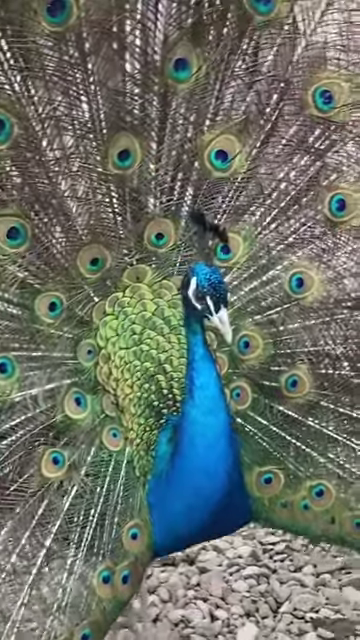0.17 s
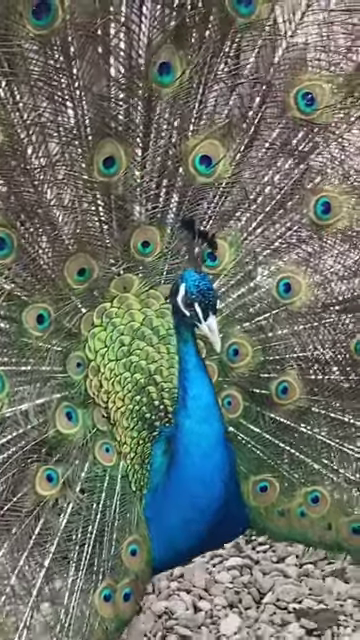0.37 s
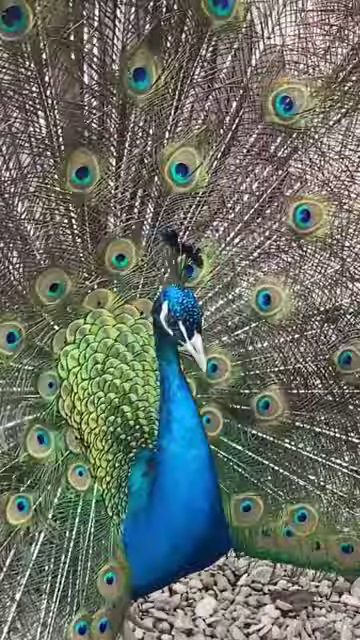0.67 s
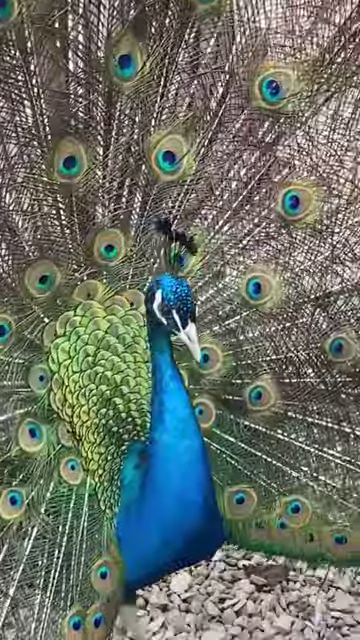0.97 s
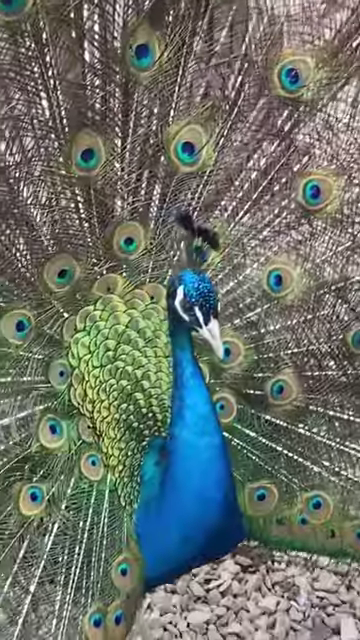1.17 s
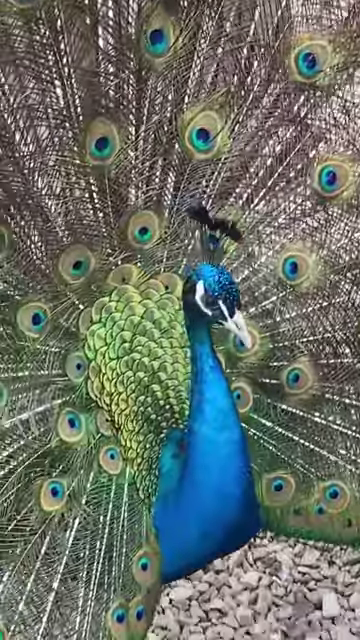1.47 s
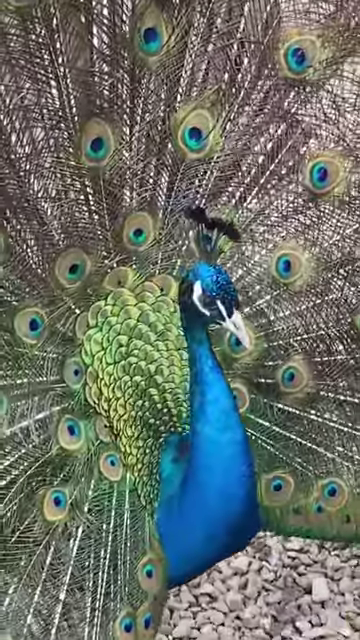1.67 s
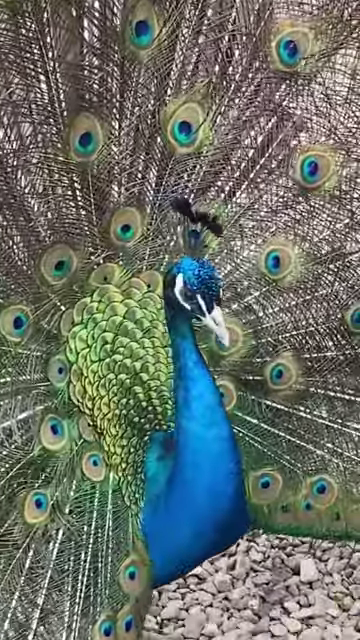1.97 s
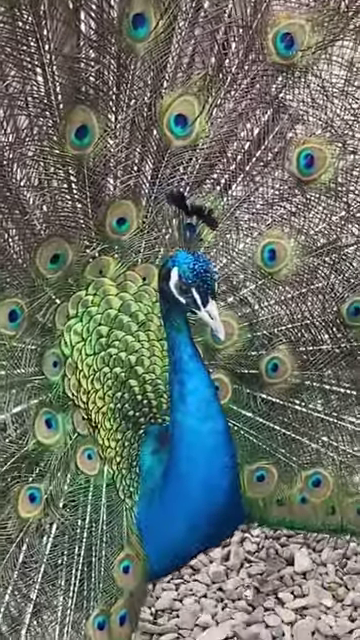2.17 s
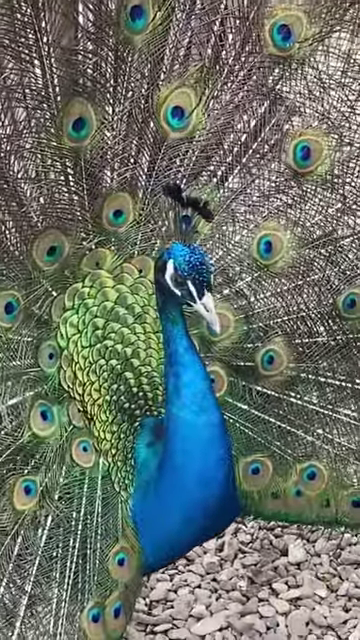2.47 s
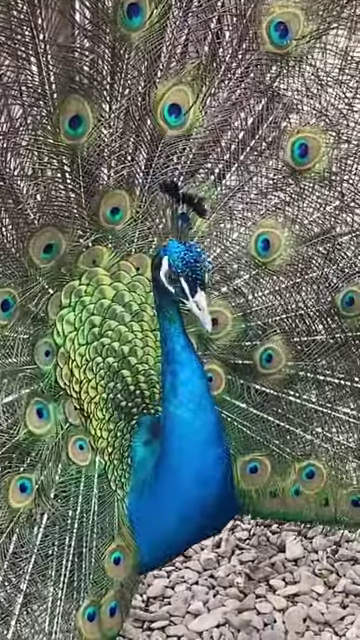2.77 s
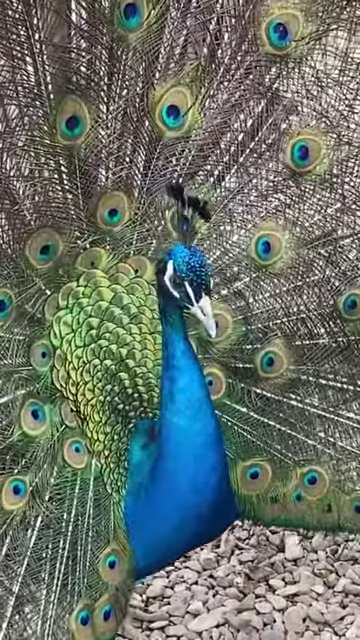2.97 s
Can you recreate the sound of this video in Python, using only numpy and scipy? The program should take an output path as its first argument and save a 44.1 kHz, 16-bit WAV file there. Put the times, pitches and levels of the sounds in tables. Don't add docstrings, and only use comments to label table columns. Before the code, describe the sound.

Peacock feathers rustle dryly close to a stereo phone, with irregular crisp ticks left and right, busiest before 0.7 s and sparse after 2.4 s. A far hoarse fowl call fades by 0.2 s. Reverberant falling sparrow chirps come at 0.1, 0.6, 1.0, 1.25, 2.0 and 2.7-3.0 s; clearer whistles at 0.6 and 2.3 s. Faint peeps, thin cicadas, low traffic and motor hum continue.

```python
import sys
import numpy as np
from scipy import signal
from scipy.io import wavfile

SR = 44100
rng = np.random.default_rng(int(sys.argv[2]) if len(sys.argv) > 2 else 0)


def nominal_scale(level):
    x = np.asarray(level, float) / 20
    return 10 ** x


def master(y):
    cut = np.clip(np.atleast_2d(y).T, -1, 1)
    pcm = np.round(cut * 32767)
    wavfile.write(sys.argv[1], SR, pcm.astype(np.int16))


N = 138033

# pitch_hz, level_db (per Hz)
BED_SPECTRUM = [(22, -80), (58, -52.5), (85, -61.5), (160, -61.5), (260, -66), (500, -69), (720, -77),
                (900, -76), (1400, -83), (2000, -87.5), (3400, -88.5), (4500, -93), (5200, -104), (8000, -108),
            (15000, -114)]
# pitch_hz, likeness_share
LEFT_RIGHT_LIKENESS = [(60, .99), (180, 1), (350, 0.52), (700, 0.32), (1400, 0.24), (3000, .02)]
# time_s, level_db
TRAFFIC_SWELL = [(0.0, -46), (0.29, -48), (1.25, -45.5), (2.51, -48.5), (2.75, -46.5), (2.9, -46.5),
                 (3.13, -45)]
TRAFFIC_REACH_HZ = 600
TRAFFIC_LAG_S = .0007

# time_s, pitch_hz, first_partial_db, second_partial_db
MOTOR_HUM = [(0.0, 106.5, -32.5, -45), (0.02, 107.2, -38, -46.5), (0.65, 107.6, -30, -35.5),
             (0.71, 107.0, -31, -42), (1.46, 106.2, -32, -36.5), (1.64, 105, -31, -41.5),
             (1.73, 105.9, -37, -35.5), (2.54, 105.6, -33, -47), (2.55, 104.6, -35, -61),
             (2.61, 105.8, -33.5, -44.5), (2.93, 105.4, -30.5, -42.5), (3.13, 105.2, -30.5, -36.5)]
HUM_THIRD_DB, HUM_FLUTTER_DB, HUM_LEAD_RAD = -72, 0.67, 0.31

# pitch_hz, width_hz, level_db
CICADA_BODIES = [(5628, 920, -54.5), (6487, 520, -51), (7040, 630, -54.5)]
CICADA_CLICKS_PER_S, CICADA_SWELL_DB = 9800, 1.52

# pitch_hz, width_hz, level_db
FOWL_THROAT = [(1340, 450, -47), (2000, 420, -45), (2194, 110, -48.5)]
FOWL_END_S, FOWL_RELEASE_S = 0.14, 0.041

# time_s, peak_db, left_right_db
QUILL_TICKS = [(0.018, -33, 0), (0.1085, -40, 2), (0.1226, -35, -12), (0.266, -40, 0.5),
               (0.2843, -43.5, -2), (0.3209, -37.5, 0.5), (0.4463, -46, -2), (0.4607, -39.5, 2),
               (0.4844, -41.5, -4), (0.5168, -39, 7), (0.5638, -42.5, -10), (0.632, -44, -0.5),
               (0.855, -49, -7), (0.9232, -40, -6), (0.9458, -53, -5.5), (1.0748, -37, -3),
               (1.4591, -47, -4), (1.5584, -48, 5), (1.6317, -47, -8), (1.6835, -46, -0.5),
               (1.779, -39.5, 5), (1.8982, -38, -2), (1.9364, -53, -1.0), (1.9658, -39, 4),
               (2.0536, -37, 1), (2.0726, -36.5, 5), (2.2121, -53, 9), (2.2413, -44, -1), (2.3929, -38, -1),
               (3.021, -54.5, -1.5)]
# pitch_hz, width_hz, level_db
QUILL_COLOUR = [(6600, 3600, -13.5), (9250, 1500, 9.5), (14800, 600, 7)]
FLURRY_PER_S, FLURRY_DB, FLURRY_S, FLURRY_LEAD_S = 2800, -18.5, 0.032, 0.0054
QUIVER_DB = -75.5

# start_s, length_s, pitch_hz, level_db, left_right_db
FALLING_CHIRPS = [
    (.105, 0.085, 4190, -41, 1.5),
    (.600, 0.08, 4150, -40.5, -1.5),
    (1.005, 0.092, 3913, -46, 1),
    (1.250, 0.089, 4182, -43, 2),
    (1.965, 0.09, 4165, -41, 0),
    (2.130, .1, 3912, -54.5, 10.5),
    (2.730, 0.098, 4260, -41.5, -1),
    (2.850, 0.099, 3970, -47.5, 4.5),
    (2.985, .11, 4080, -52.5, 2),
]
# length_share, pitch_ratio, level_db
FALLING_SHAPE = [(0, 1.42, -24), (0.102, 1.33, -5), (.22, 1.27, -16), (.3, 1.03, 0), (0.521, .98, 2),
                 (0.619, .8, -2.5), (.88, .76, -2.5), (0.998, .68, -25)]
TRILL_HZ, TRILL_DEPTH, RASP_DB, BEAK_CUT_HZ = 330.3, 0.0671, 3.5, 11000

# start_s, length_s, pitch_hz, level_db, left_right_db
CLEAR_CHIRPS = [
    (.583, .082, 3316, -37.5, 3.5),
    (2.266, .08, 3305, -36.5, 2.5),
]
# length_share, pitch_ratio, level_db
CLEAR_SHAPE = [(0, 1.2, -12), (.12, 1.22, -12.5), (.32, 1.07, -11), (.42, .89, -12), (.58, 0.98, -6),
               (.7, .99, -2), (.92, 0.78, -14.5), (1, 1.1, -29.5)]

# start_s, length_s, pitch_hz, level_db, left_right_db
BIRD_PEEPS = [
    (2.925, .05, 1650, -52, 0),
    (.525, .03, 3050, -57, 0),
    (.375, .025, 3400, -56, 0),
    (.822, .04, 2450, -57, 0),
    (2.385, .04, 2620, -56, 0),
    (1.455, .03, 3350, -55, 0),
    (1.66, .03, 4250, -57, 0),
]
# length_share, pitch_ratio, level_db
PEEP_SHAPE = [(0, 1, -15), (.3, 0.97, 4.5), (.7, 1, 1.5), (1, .99, -10)]

YARD_T60_S, YARD_GAP_S, ECHO_S, ECHO_DB = 1, .004, 0.11, -9.5
EARLY_T60_S, EARLY_DB = 0.17, 4.5


def at_hz(points, hz):
    table_hz, value = np.transpose(points)
    return np.interp(np.log(hz), np.log(table_hz), value)


def drift(rate):
    r = np.exp(-80 * np.pi * rate / SR)
    noise = rng.standard_normal(N // 40 + 2002)
    slow = signal.lfilter([1], [1, -2 * r, r * r], noise)[2000:]
    slow = (slow - slow.mean()) / slow.std()
    return np.interp(np.arange(N) / 40, np.arange(len(slow)), slow)


def peak(x, hz, width):
    r = np.exp(-np.pi * width / SR)
    zeros = np.array([1, 0, -1]) * (1 - r * r) / 2
    poles = [1, -2 * r * np.cos(2 * np.pi * hz / SR), r * r]
    return signal.lfilter(zeros, poles, x + 1e-18)


def rms_one(x):
    return x / np.sqrt(np.mean(x ** 2))


def traffic_and_air(patchy_db):
    out = 0
    edges = 18 * 2 ** np.arange(0, 9.9, 1 / 3)
    swell_db = np.interp(np.arange(N) / SR, *np.transpose(TRAFFIC_SWELL))
    swell_db = swell_db - swell_db.mean()
    white = rng.standard_normal((2, 2, N + SR // 2))
    for k, (low, high) in enumerate(zip(edges, edges[1:])):
        band = signal.butter(2, [low, high], "band", fs=SR, output="sos")
        mid, side = signal.sosfilt(band, white[k % 2])[:, -N:]
        hz = np.sqrt(low * high)
        alike = np.clip(at_hz(LEFT_RIGHT_LIKENESS, hz), -.99, .99)
        level_db = at_hz(BED_SPECTRUM, hz) + patchy_db * drift(8.5)
        level_db = level_db + swell_db / (1 + (hz / TRAFFIC_REACH_HZ) ** 2)
        gain = nominal_scale(level_db) * np.sqrt(SR / 2)
        stereo = np.sqrt(1 + alike) * mid + np.sqrt(1 - alike) * side * [[1], [-1]]
        out = out + gain * stereo / np.sqrt(2)
    return np.array([out[0], np.roll(out[1], int(TRAFFIC_LAG_S * SR))])


def motor_hum():
    s, hz, first_db, second_db = np.transpose(MOTOR_HUM)
    t = np.arange(N) / SR
    phase = 2 * np.pi * np.cumsum(np.interp(t, s, hz)) / SR
    levels = [np.interp(t, s, first_db), np.interp(t, s, second_db), HUM_THIRD_DB]
    lead = HUM_LEAD_RAD * np.array([[.5], [-.5]])
    out = 0
    for k, db in enumerate(levels, 1):
        gain = np.sqrt(2) * nominal_scale(db + k * HUM_FLUTTER_DB * drift(9.3))
        out = out + gain * np.sin(k * (phase + k * lead))
    return out


def cicadas():
    clicks = rng.standard_normal((2, N)) * (rng.random((2, N)) < CICADA_CLICKS_PER_S / SR)
    out = 0
    for k, (hz, width, db) in enumerate(CICADA_BODIES):
        ring = rms_one(peak(peak(clicks, hz, width), hz, width))
        out = out + nominal_scale(db + CICADA_SWELL_DB * drift(3.4)) * ring * (-1) ** k
    return out


def fowl():
    t = np.arange(N) / SR
    noise = rng.standard_normal((2, N + SR // 10))
    voice = 0
    for hz, width, db in FOWL_THROAT:
        voice = voice + nominal_scale(db) * rms_one(peak(peak(noise, hz, width), hz, width))[:, -N:]
    return voice * np.exp(-np.maximum(t - FOWL_END_S, 0) / FOWL_RELEASE_S)


def feathers():
    t = np.arange(N) / SR
    ticks = np.zeros((2, N))
    stir = np.full(N, nominal_scale(QUIVER_DB))
    for s, peak_db, pan_db in QUILL_TICKS:
        ticks[:, int((s + .001) * SR)] = nominal_scale(peak_db + 14.5 + np.array([pan_db / 2, -pan_db / 2]))
        age = np.where(t > s, (t - s) / FLURRY_S, (s - t) / FLURRY_LEAD_S)
        stir += nominal_scale(peak_db + FLURRY_DB) * np.exp(-age)
    sizes = nominal_scale(5.62 * np.minimum(rng.exponential(1, (2, N)), 4)) * rng.choice([-1, 1], (2, N))
    barbs = sizes * (rng.random((2, N)) < FLURRY_PER_S / SR) * stir
    barbs = barbs + 0.23 * barbs[::-1]
    ticks[1] = np.roll(ticks[1], 1)
    bright = 0
    for k, (hz, width, db) in enumerate(QUILL_COLOUR):
        bright = bright + nominal_scale(db) * peak(ticks + barbs, hz, width) * (-1) ** k
    return signal.sosfilt(signal.butter(2, 4000, "high", fs=SR, output="sos"), bright)


def chirps(rows, shape, trill, overtone_db):
    out = np.zeros((2, N + SR))
    share, ratio, shape_db = np.transpose(shape)
    wobble, rasp = drift(153.5), drift(90)
    rasp_db = RASP_DB * trill / TRILL_DEPTH
    for start, length, hz, level_db, pan_db in rows:
        t = np.arange(int(length * SR)) / SR
        i = int(start * SR)
        here = slice(i, i + len(t))
        shake = trill * (np.sin(2 * np.pi * TRILL_HZ * t) + 0.57 * wobble[here])
        pitch = hz * np.interp(t / length, share, ratio) * (1 + shake)
        phase = 2 * np.pi * np.cumsum(pitch) / SR
        db = level_db + np.interp(t / length, share, shape_db) + rasp_db * rasp[here]
        tone = nominal_scale(db) * (np.sin(phase) + nominal_scale(overtone_db) * np.sin(2 * phase))
        out[:, here] += np.sqrt(2) * tone * nominal_scale([[pan_db / 2], [-pan_db / 2]])
    return signal.sosfilt(signal.butter(8, BEAK_CUT_HZ, fs=SR, output="sos"), out[:, :N])


def decay(gap, t60):
    t = np.arange(SR) / SR
    return (t > gap) * nominal_scale(-60 * np.maximum(t - gap, 0) / t60)


def yard(x, direct_db, wet_db):
    fall = decay(YARD_GAP_S, YARD_T60_S)
    fall = fall + nominal_scale(EARLY_DB) * decay(YARD_GAP_S, EARLY_T60_S)
    fall = fall + nominal_scale(ECHO_DB) * decay(ECHO_S, EARLY_T60_S)
    tail = rng.standard_normal((2, SR)) * fall
    tail = signal.lfilter([.4], [1, -.6], tail)
    tail = tail / np.sqrt(np.sum(tail ** 2) / 2)
    return nominal_scale(direct_db) * x + nominal_scale(wet_db) * signal.fftconvolve(x, tail, axes=1)[:, :N]


def birds():
    far = chirps(FALLING_CHIRPS, FALLING_SHAPE, trill=TRILL_DEPTH, overtone_db=-14)
    near = chirps(CLEAR_CHIRPS, CLEAR_SHAPE, trill=.012, overtone_db=-24)
    near = near + chirps(BIRD_PEEPS, PEEP_SHAPE, trill=.01, overtone_db=-30)
    return yard(far, direct_db=-5.5, wet_db=0.5) + yard(near, direct_db=0, wet_db=-8)


def scene():
    background = traffic_and_air(patchy_db=1.52) + motor_hum() + cicadas()
    return background + fowl() + feathers() + birds()


def low_pass(x):
    return signal.sosfilt(signal.butter(12, 15830, fs=SR, output="sos"), x)


def record(dry):
    return low_pass(dry)


dry = scene()
out = record(dry)
master(out)
```